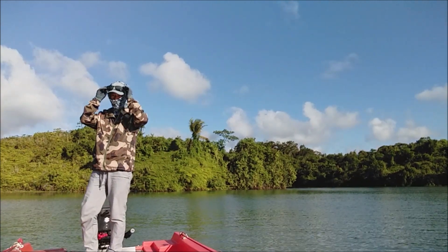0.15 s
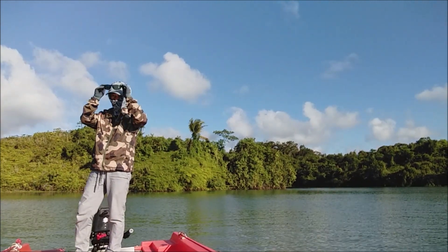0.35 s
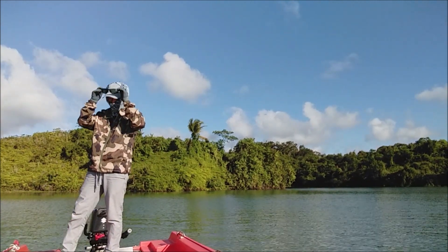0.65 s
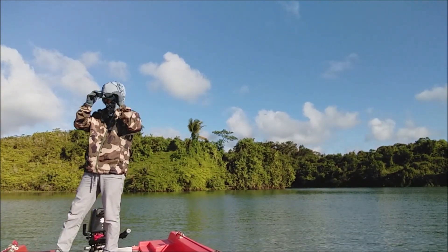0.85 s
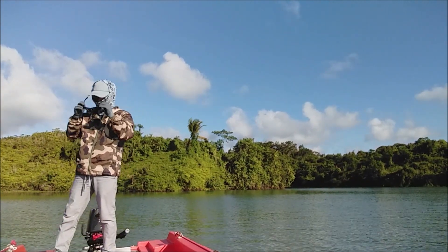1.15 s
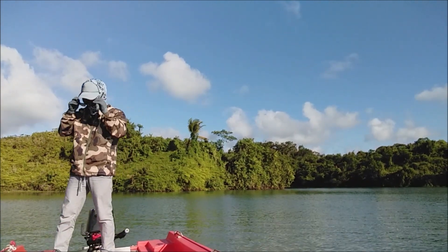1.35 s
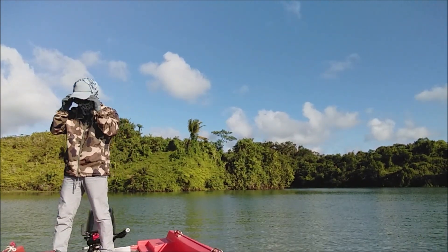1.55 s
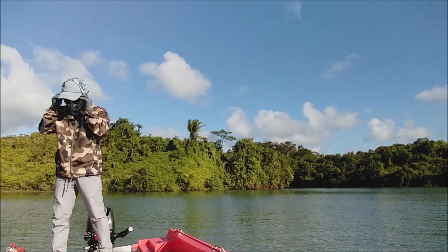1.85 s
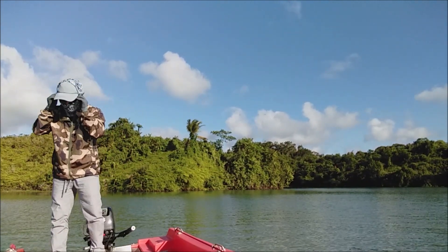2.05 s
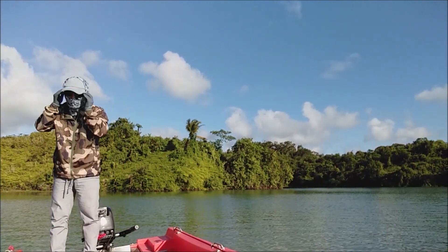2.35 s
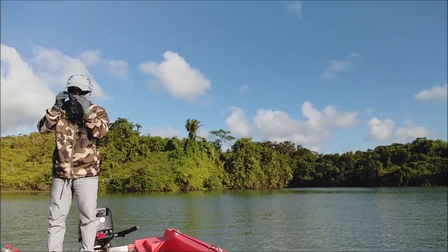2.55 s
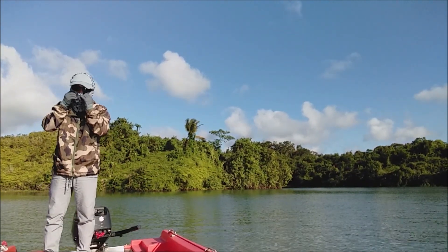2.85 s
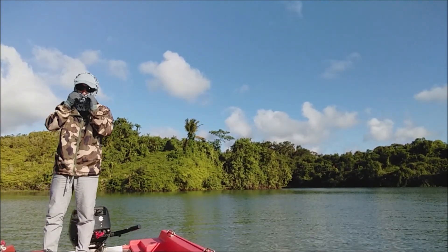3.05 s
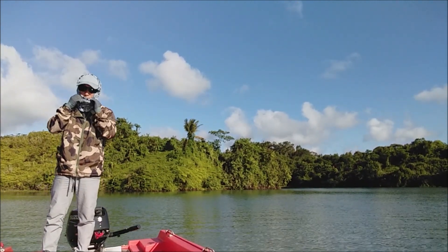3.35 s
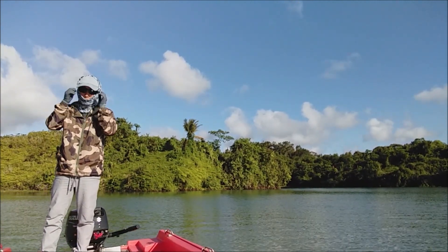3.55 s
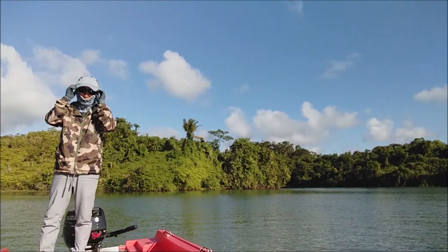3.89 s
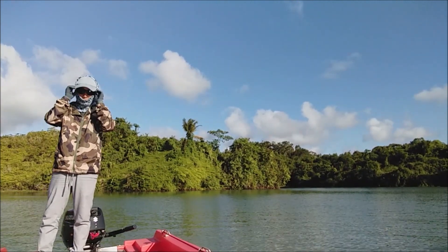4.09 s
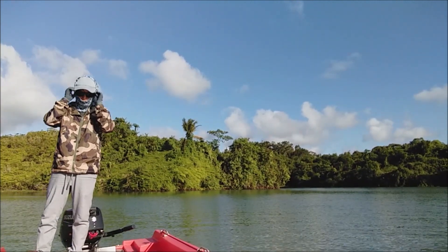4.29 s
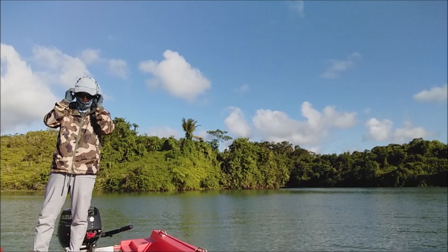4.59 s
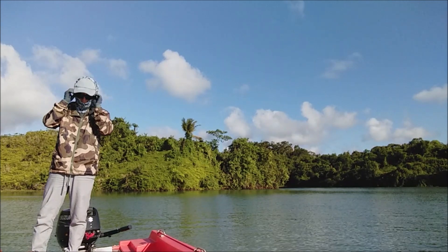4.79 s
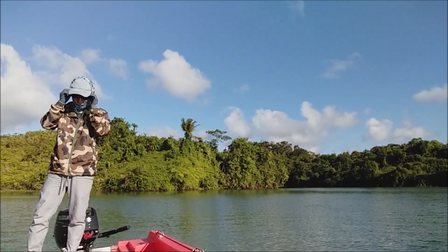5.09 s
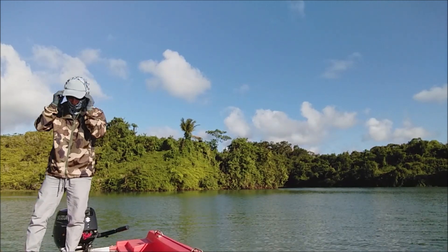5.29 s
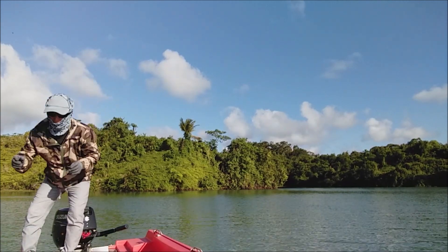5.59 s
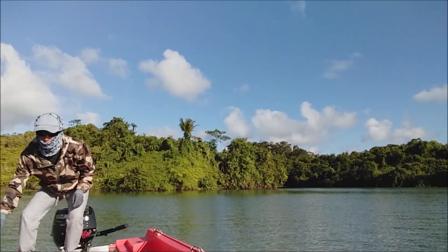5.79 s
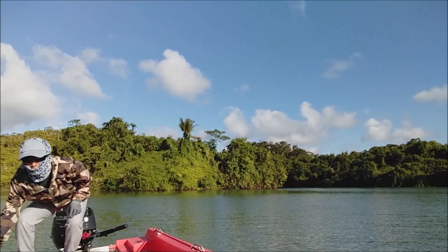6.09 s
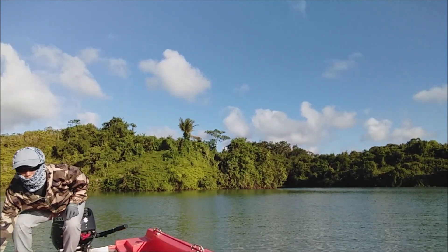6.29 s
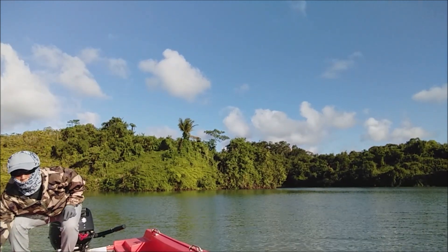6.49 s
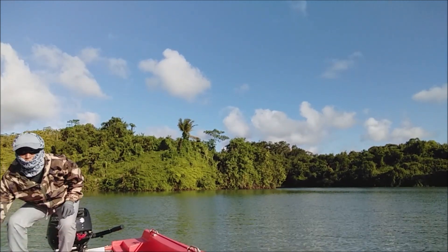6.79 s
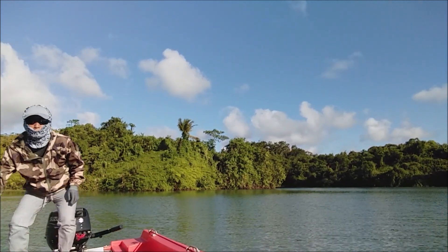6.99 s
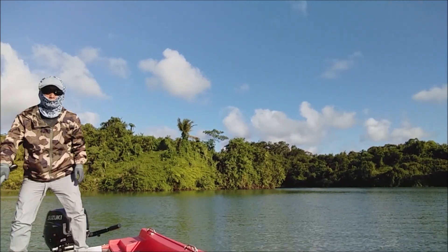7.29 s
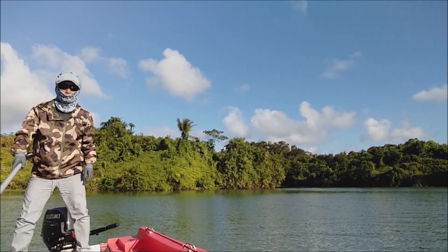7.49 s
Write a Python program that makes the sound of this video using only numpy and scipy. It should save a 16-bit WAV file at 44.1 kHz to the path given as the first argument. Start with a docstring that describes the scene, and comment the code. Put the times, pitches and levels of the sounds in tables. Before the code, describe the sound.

Outdoors on a calm lake, high insects pulse faintly over a soft hush. An angler shifts on a small plastic boat: dull low knocks, slight ripples, dry clicks and a sharper gear rap. A faint bird whistles midway. Then cloth rustles and the hull thumps in a dense, loud, irregular run of hollow knocks to the end. Close microphone on the boat, dry, no echo.

```python
"""Insects pulse and hum on the bank of a calm lake all along, as shaped noise over a faint hush.
First an angler shifts his feet on a small plastic boat: pushes on filtered panels knock, ripples murmur
under the hull, and hard gear clicks and raps as bursts of noise with ringing tones. Then a far bird whistles
in sliding tones and hollow gear clonks. At last he bends down: his jacket rustles as swelling noise, and the
rocking hull thumps in a dense run of hollow knocks, with more raps, a clonk and one peep among them."""
import sys
import numpy as np
from scipy import signal
from scipy.fft import rfft, irfft, next_fast_len
from scipy.io import wavfile
from scipy.ndimage import map_coordinates

SR = 44100
rng = np.random.default_rng(int(sys.argv[2]) if len(sys.argv) > 2 else 0)


def wrap_up_sound(samples):
    """Save the sound to the file named by the first command line argument, as 16-bit audio."""
    columns = np.atleast_2d(samples).T
    # keep every value between -1 and 1, then stretch to whole-number steps
    tamed = np.clip(columns, -1, 1)
    steps = np.round(tamed * 32767).astype(np.int16)
    wavfile.write(sys.argv[1], SR, steps)


N = 336873
TIME = np.arange(N) / SR  # seconds since the start of the scene
AGE = np.arange(SR // 2) / SR  # seconds since a blow, for half a second
TOP_HZ = 14290  # upper limit of the finished sound

# Spectra of noises. Each row: frequency in Hz, relative level per Hz in dB.
AIR_SPECTRUM = [(20, -21), (35, -24), (65, 7.5), (150, 3.5), (300, 0), (480, -8.5), (1000, -9.5),
                (1900, -11.5), (3400, -3.5), (5200, -2.5), (6800, -11), (10000, -8), (14000, -10.5)]
SINGER_SPECTRUM = [(7000, -45), (8300, -19), (9300, -15), (10150, -14), (10600, -8), (11100, -3),
                   (11600, 0.5), (12100, -7.5), (13000, -24.5), (14000, -36)]
CHORUS_SPECTRUM = [(6500, -22), (8400, -8), (9100, -12.5), (9900, -0.5), (10300, -2), (11400, -5.5),
                   (12450, -10.5), (13300, -26.5), (14500, -34)]
CLOTH_SPECTRUM = [(300, 10.5), (1000, -2.5), (2500, -4), (5500, 2.5), (8000, -2.5), (14000, -7.5)]
SNAP_SPECTRUM = [(600, -44), (1400, -12), (2000, -5.5), (3200, -5), (6000, -5.5), (8500, -10), (14000, -12)]
HOLLOW_WASH_SPECTRUM = [(50, -22), (100, -9.5), (200, -3.5), (340, 1), (470, 0), (620, -10), (900, -21),
                        (2500, -43)]
CRACK_SPECTRUM = [(200, -24), (700, -2.5), (1500, 2.5), (2400, -4), (3800, -5.5), (6000, -6.5), (9000, -21),
                  (14000, -22)]
RATTLE_SPECTRUM = [(90, 14), (250, -3), (550, 5), (1050, 0), (1450, 4), (1900, -2.5), (2500, -2.5),
                   (6000, -15), (12000, -38)]

# The pulsing insect's phrases. Each row: middle in seconds, length in seconds, level in dB.
SINGER_PHRASES = [(.39, 0.45, -67), (1.13, 0.4, -65.5), (1.76, 0.52, -63), (2.4, 0.36, -71),
                  (3.12, .3, -66), (3.76, 0.52, -66), (4.57, 0.5, -65), (5.1, 0.17, -66),
                  (5.4, 0.34, -64.5), (6.01, 0.29, -64), (6.57, 0.59, -65), (7.26, 0.57, -62)]
SINGER_REST_DB = -73  # between phrases
# Loudness of the steady insects. Each row: time in seconds, level in dB before the chorus trim.
CHORUS_LEVELS = [(0, -71), (1.65, -69), (2.9, -72.5), (4.45, -74.5), (5.1, -80.5), (6.3, -74), (6.8, -69.5),
                 (7.64, -75)]

# A far bird's rising whistles. Each row: start in seconds, level in dB before the flutter.
BIRD_WHISTLES = [(3.92, -80), (4.12, -77), (4.32, -72), (4.525, -72), (4.715, -75), (4.92, -70)]
WHISTLE_S, WHISTLE_FROM_HZ, WHISTLE_TO_HZ = .13, 4750, 6300
PEEP_S, PEEP_LENGTH_S, PEEP_HZ, PEEP_DB = 6.864, .043, 2975, -59  # a note without a slide

# Ripples slapping under the hull. Each row: middle in seconds, length in seconds, level in dB before the trim.
HULL_RIPPLES = [(.3, 0.74, -64.5), (.66, .1, -61), (.95, 0.21, -54), (1.15, .1, -57), (2.0, 0.38, -68),
                (2.29, 0.13, -52), (2.8, 0.21, -61.5), (5.06, 0.11, -61), (5.4, 0.098, -66),
                (5.73, 0.48, -62), (6.06, 0.085, -49.5), (6.25, 0.84, -59.5), (6.87, 0.11, -46),
                (7.3, 0.11, -33.5), (7.6, 0.098, -34.5)]
# Water at rest, before the trim; water stirred by a blow, against that blow; time to fall by 60 dB.
CALM_DB, STIR_DB, STIR_T60_S = -80, -12, 0.1

# The jacket rubs as he bends and straightens. Each row: middle in seconds, length in seconds, level in dB.
JACKET_RUBS = [(5.7, 0.35, -68), (5.81, 0.15, -63.5), (6.06, 0.31, -62.5), (6.55, 1, -71.5),
               (7.03, 0.45, -64), (7.5, 0.65, -66)]

# Small plastic clicks. Each row: start in seconds, snap level in dB before the snap trims, ring level in dB,
# ring pitch in Hz, time in seconds for the ring to fall by 60 dB.
PLASTIC_CLICKS = [(1.126, -74, -52, 1436, 0.057), (1.126, -78, -57, 1640, 0.054),
                  (1.9773, -46.5, -37, 3070, 0.02), (2.493, -60, -64, 2400, 0.064),
                  (3.710, -66, -63, 3500, .06), (3.8148, -51.5, -48, 3580, 0.029),
                  (4.268, -54.5, -60, 3530, 0.057), (4.939, -72, -52.5, 1255, 0.12),
                  (4.962, -52.5, -58, 2160, 0.047), (5.4878, -58, -55.5, 2190, 0.079),
                  (5.492, -69, -59, 1830, 0.11), (7.608, -75, -57, 1880, 0.047)]
# Overtones of small plastic parts. Each row: pitch in Hz, relative level in dB, seconds to fall by 60 dB.
PLASTIC_OVERTONES = [(1850, -8.5, .04), (2400, -9.5, .04), (3260, -5, 0.056), (3730, -8, .035),
                     (4530, -5, 0.038), (4870, -4, .03), (6100, -7, 0.026)]

# Bumps on a hollow piece of gear. Each row: start in seconds, level in dB.
HOLLOW_BUMPS = [(4.956, -37), (6.621, -33.5)]
# Tones of that hollow piece. Each row: pitch in Hz, relative level in dB, seconds to fall by 60 dB.
HOLLOW_MODES = [(105, -10, 0.17), (409, -6.5, 0.069), (450.2, -3, 0.21), (524, -12.5, 0.26),
                (573, -27, 0.22), (595, -13.5, 0.025)]

# Hard gear striking or scuffing the deck. Each row: start in seconds, crack level in dB, rattle level in dB,
# deck ring level in dB.
GEAR_RAPS = [(1.122, -50.5, -58.5, -74), (2.213, -80, -69.5, -66), (2.25, -80, -71, -67.5),
             (2.621, -43, -54.5, -38), (6.619, -52.5, -61.5, -56), (6.668, -46.5, -56.5, -46),
             (6.681, -42.5, -60, -64), (7.137, -52.5, -61.5, -55), (7.256, -49.5, -56.5, -60),
             (7.329, -67, -59, -46.5)]
# Tones of the deck. Each row: pitch in Hz, relative level in dB, seconds to fall by 60 dB.
DECK_MODES = [(117, -6, 0.24), (160, -17, .2), (208, -8, 0.33), (323, -6, 0.19), (367, 1, 0.2),
              (440.5, -5, 0.2), (522, -14, 0.26), (578, -2.5, 0.11), (707, -10, 0.116), (1420, -19, .16),
              (1550, -29, 0.13), (1863, -17, .07), (3070, -23, 0.043)]

# Dull blows on the hull. Each row: time in seconds, peak level of the boom in dB, contact time in seconds,
# scuffing before the blow in seconds, settling after it in seconds.
HULL_KNOCKS = [(0.2188, -49, .007, 0.033, 0.057), (0.6682, -42.5, 0.0055, 0.0089, 0.0056),
               (0.8408, -37.5, 0.0069, 0.0045, .015), (0.8908, -45, .0048, .008, 0.024),
               (0.9759, -50.5, 0.0036, 0.031, 0.014), (2.2312, -45, .0066, 0.075, 0.015),
               (2.639, -39.5, 0.0014, .004, 0.0037), (2.6428, -34.5, 0.0024, 0.0018, 0.021),
               (2.6852, -37.5, 0.0025, 0.0054, 0.01), (2.73, -46.5, 0.0021, 0.02, .008),
               (5.5407, -48.5, 0.01, .012, 0.016), (5.72, -43, 0.004, 0.012, .008),
               (5.904, -40.5, 0.0034, 0.0075, 0.037), (6.0386, -47, .009, .012, 0.029),
               (6.0849, -38, 0.0048, 0.019, 0.0025), (6.273, -31.5, 0.0029, 0.012, .014),
               (6.3138, -38, 0.0052, 0.0046, 0.0034), (6.444, -34, 0.0041, 0.0034, 0.013),
               (6.473, -33.5, 0.0035, 0.021, 0.012), (6.4941, -30.5, 0.0022, 0.0047, 0.0064),
               (6.5042, -26, 0.0034, .004, 0.011), (6.5231, -27, 0.0041, 0.0045, 0.019),
               (6.576, -30, 0.0071, 0.01, 0.0036), (6.6651, -19, .0021, 0.0063, 0.015),
               (6.6886, -25.5, 0.0029, .016, 0.02), (6.741, -33.5, 0.0047, 0.028, 0.0039),
               (6.862, -39.5, .0038, 0.055, 0.044), (6.89, -32.5, 0.0052, 0.014, .012),
               (6.931, -23.5, 0.0021, 0.0057, 0.0039), (6.9372, -24.5, 0.0023, 0.0035, 0.0051),
               (6.966, -29, 0.0035, 0.0044, 0.011), (6.9806, -22.5, 0.0018, .003, .004),
               (6.99, -11.5, 0.0029, .003, 0.0075), (7.0057, -30, .0035, .004, 0.013),
               (7.0711, -19.5, 0.0028, 0.0066, 0.022), (7.0864, -24.5, 0.002, .004, 0.0055),
               (7.0951, -22.5, 0.0028, 0.0044, 0.0084), (7.16, -23, 0.0042, 0.0087, 0.0084),
               (7.1977, -21.5, 0.0021, 0.0086, 0.041), (7.2235, -16, 0.0022, 0.021, 0.01),
               (7.2503, -24.5, 0.002, 0.006, .012), (7.3026, -15, 0.0014, 0.0089, 0.012),
               (7.3105, -14, 0.0021, 0.0036, 0.0063), (7.3449, -23, 0.0034, 0.012, .008),
               (7.415, -20, 0.002, 0.0093, .016), (7.433, -17.5, 0.0022, 0.018, .008),
               (7.484, -11.5, 0.0011, .003, .004), (7.4906, -20, 0.0047, .003, 0.01),
               (7.558, -19, 0.0019, 0.0089, 0.014), (7.5649, -21, 0.00071, 0.0026, 0.0058),
               (7.5719, -16.5, 0.0016, 0.0033, 0.023), (7.6061, -24.5, 0.0027, 0.013, 0.091)]
# Resonances of the shell, shared by all panels. Each row: pitch in Hz, width in Hz, level against the panel in dB.
SHELL_MODES = [(66.4, 14, -16), (244, 97, -14), (378, 180, -14.5), (600, 170, -13.5)]
# Panel pitch at this contact time; a softer blow moves a wider, lower panel, by this power.
PANEL_HZ, PANEL_CONTACT_S, PANEL_SAG = 152.5, 0.0019, 0.3
PANEL_TOP_HZ = 174  # pitch of the smallest panel
# Lesser contacts: typical spacing, level against the blow, loss over the scuffing or settling time.
CLATTER_GAP_S, CLATTER_DB, CLATTER_FALL_DB = 0.00746, -0.5, 12
SOFTENING = 0.32  # a weaker contact lasts longer, by this power of its relative strength


def amp(db):
    """Turn decibels into a gain."""
    return 10 ** (np.asarray(db) / 20)


def unit(x):
    """Scale a sound to an average strength (rms) of 1."""
    return x / np.sqrt(np.mean(x ** 2) + 1e-20)


def wobble(rate):
    """A smooth random curve through this many random points a second."""
    points = rng.standard_normal(int(N * rate / SR) + 4)
    return map_coordinates(points, [TIME * rate])


def filtered(x, response):
    """Reshape a sound by a response that depends on frequency."""
    size = next_fast_len(len(x) + 8192)
    hz = np.fft.rfftfreq(size, 1 / SR)
    return irfft(rfft(x, size) * response(hz), size)[:len(x)]


def noise(spectrum, size=N):
    """Random hiss of rms 1, coloured by the points of a spectrum."""
    points_hz, points_db = np.transpose(spectrum)

    def colour(hz):
        return amp(np.interp(np.log(hz + 1), np.log(points_hz), points_db))

    return unit(filtered(rng.standard_normal(size), colour))


def fade(t60, attack):
    """A struck thing swells quickly, then dies away by 60 dB in t60 seconds."""
    decay = np.exp(-np.log(1000) * AGE / t60)
    return decay * (1 - np.exp(-AGE / attack))


def ring(modes, scatter_db, attack):
    """A struck thing rings in several tones, each of slightly new strength every time."""
    total = np.zeros(len(AGE))
    for k, (hz, db, t60) in enumerate(modes):
        strength = amp(db + scatter_db * rng.standard_normal())
        tone = np.sin(2 * np.pi * hz * AGE) * fade(t60, attack)
        total += (-1) ** k * strength * tone
    return total


def swells(rows):
    """Summed power of bell-shaped swells, each 6 dB down at the ends of its length."""
    power = np.zeros(N)
    for middle, length, db in rows:
        offset = 2 * (TIME - middle) / length
        power += amp(db) ** 2 * .5 ** (2 * offset ** 2)
    return power


def add(track, s, sound):
    """Mix a sound into the track at time s."""
    part = track[max(round(s * SR), 0):][:len(sound)]
    part += sound[:len(part)]


def shell(hz, panel_hz, panel_q=2.0, damping_hz=800, leak_hz=55):
    """A panel booms with the shell's broad modes; plastic swallows treble and radiates no deep bass."""
    def mode(centre, width):
        return 1j * hz * width / (centre ** 2 - hz ** 2 + 1j * hz * width)

    modes = mode(panel_hz, panel_hz / panel_q)
    for centre, width, db in SHELL_MODES:
        modes = modes + amp(db) * mode(centre, width)
    treble_loss = np.sqrt(1 + (hz / damping_hz) ** 4)
    bass_loss = np.sqrt(1 + (leak_hz / (hz + 1)) ** 10)
    return modes / treble_loss / bass_loss


def air(level_db=-70):
    """Open air is a faint, steady hush of coloured noise."""
    return amp(level_db) * noise(AIR_SPECTRUM)


def insects(chorus_trim_db=2, stroke_hz=22.9, depth_db=7.0, uneven_db=1.3):
    """One singer buzzes in swelling phrases of regular wing strokes over a steady chorus."""
    phrasing = np.sqrt(amp(SINGER_REST_DB) ** 2 + swells(SINGER_PHRASES))
    stroke = np.cos(2 * np.pi * (stroke_hz * TIME - .27))
    # tanh flattens the strokes, so the buzz switches briskly between strong and weak
    pulsing_db = depth_db * np.tanh(2.4 * stroke) + uneven_db * wobble(15)
    singer = unit(amp(pulsing_db) * noise(SINGER_SPECTRUM))
    chorus_db = np.interp(TIME, *np.transpose(CHORUS_LEVELS)) + chorus_trim_db
    return phrasing * singer + amp(chorus_db) * noise(CHORUS_SPECTRUM)


def note(length, start_hz, end_hz, db, overtone_db, waver=0.055, flutter_db=3.0):
    """A thin whistle with an octave overtone; the wider its slide, the less steady it is."""
    u = np.linspace(0, 1, int(length * SR))  # progress from 0 to 1
    slide = np.sin(np.pi * u / 2) + waver * wobble(300)[:len(u)]
    hz = start_hz + (end_hz - start_hz) * slide
    phase = 2 * np.pi * np.cumsum(hz) / SR
    level = amp(db + flutter_db * wobble(140)[:len(u)]) * np.sin(np.pi * u)
    return level * (np.sin(phase) + amp(overtone_db) * np.sin(2 * phase))


def bird():
    """A far bird repeats one rising whistle; later comes a single level peep with a strong octave."""
    track = np.zeros(N)
    for s, db in BIRD_WHISTLES:
        add(track, s, note(WHISTLE_S, WHISTLE_FROM_HZ, WHISTLE_TO_HZ, db, overtone_db=-40))
    add(track, PEEP_S, note(PEEP_LENGTH_S, PEEP_HZ, PEEP_HZ, PEEP_DB, overtone_db=-2))
    return track


def lapping(trim_db=-2, panel_hz=115, dull_hz=130, surge_db=2):
    """Ripples keep the shell murmuring, and every blow stirs the water anew."""
    def dull_shell(hz):
        return shell(hz, panel_hz, panel_q=1.06) * np.exp(-hz / dull_hz)

    murmur = unit(filtered(rng.standard_normal(N), dull_shell))
    power = amp(CALM_DB) ** 2 + swells(HULL_RIPPLES)
    stir = fade(STIR_T60_S, attack=0.0033)
    for s, db, *_ in HULL_KNOCKS:
        add(power, s, (amp(db + STIR_DB) * stir) ** 2)
    return np.sqrt(power) * amp(trim_db + surge_db * wobble(30)) * murmur


def jacket(grain_db=2.0, surge_db=0.3):
    """Cloth rubs in an uneven hiss that swells with each movement."""
    unevenness = amp(grain_db * wobble(60) + surge_db * wobble(14))
    return np.sqrt(swells(JACKET_RUBS)) * unevenness * noise(CLOTH_SPECTRUM)


def clicks(overtone_db=-5, snap_trim_db=-2, rough=0.66):
    """Small plastic gives a dry snap, one short rough ring and a few faint overtones."""
    track = np.zeros(N)
    for s, snap_db, ring_db, hz, t60 in PLASTIC_CLICKS:
        hiss = noise(SNAP_SPECTRUM, size=len(AGE)) * fade(t60=0.042, attack=0.00098)
        overtones = ring(PLASTIC_OVERTONES, scatter_db=2, attack=0.00075)
        snap = amp(snap_trim_db) * hiss + amp(overtone_db) * overtones
        # a random shake of the phase, in radians, roughens the ring
        phase = 2 * np.pi * hz * AGE + rough * wobble(370)[:len(AGE)]
        tone = np.sin(phase) * fade(t60, attack=0.00085)
        add(track, s, amp(snap_db) * snap + amp(ring_db) * tone)
    return track


def clonks(wash_db=-11):
    """Close modes of a hollow piece beat as they fade into the hull's dull wash."""
    track = np.zeros(N)
    for s, db in HOLLOW_BUMPS:
        wash = noise(HOLLOW_WASH_SPECTRUM, size=len(AGE)) * fade(t60=0.28, attack=0.0026)
        tones = ring(HOLLOW_MODES, scatter_db=0.5, attack=0.0012)
        add(track, s, amp(db) * (tones + amp(wash_db) * wash))
    return track


def raps():
    """Hard gear cracks on the deck, rattles briefly and sets the deck ringing."""
    track = np.zeros(N)
    for s, crack_db, rattle_db, ring_db in GEAR_RAPS:
        crack = noise(CRACK_SPECTRUM, size=len(AGE)) * fade(t60=0.02, attack=0.0009)
        rattle = noise(RATTLE_SPECTRUM, size=len(AGE)) * fade(t60=0.27, attack=0.0019)
        deck = ring(DECK_MODES, scatter_db=2.0, attack=0.0085)
        add(track, s, amp(crack_db) * crack + amp(rattle_db) * rattle + amp(ring_db) * deck)
    return track


def contact(hz, duration):
    """A push that lasts this long holds little above 1 / duration."""
    smooth_push = signal.butter(5, 1, analog=True)[1]
    return 1 / np.polyval(smooth_push, 1j * hz * duration)


def clatter(scuff_s, settle_s, jitter=0.31, scatter_db=1.0, count=6):
    """Uneven lesser contacts, as (delay in s, gain), build up to a blow and die away after it."""
    contacts = []
    # the signs put scuffing before the blow and settling after it
    for side, span in ((-0.986, scuff_s), (0.98, settle_s)):
        gaps = CLATTER_GAP_S * np.exp(jitter * rng.standard_normal(count))
        delay = np.cumsum(gaps)
        level_db = CLATTER_DB + scatter_db * rng.standard_normal(count) - CLATTER_FALL_DB * delay / span
        contacts += zip(side * delay, amp(level_db))
    return [(delay, gain) for delay, gain in contacts if gain > .04]  # leave out the faintest


def knocks(after_db=-41, after_t60=0.23, after_hz=360):
    """Each blow is a short push on a panel amid softer clatter, duller if soft; the hull shudders on after."""
    track = np.zeros(N)
    lead = SR // 40  # samples of room before the push
    push = np.zeros(len(AGE))
    push[lead] = 1.0
    for s, db, duration, scuff_s, settle_s in HULL_KNOCKS:
        panel_hz = min(PANEL_HZ * (PANEL_CONTACT_S / duration) ** PANEL_SAG, PANEL_TOP_HZ)

        def struck(hz, contact_s=duration):
            return shell(hz, panel_hz) * contact(hz, contact_s)

        def dull_struck(hz):
            return struck(hz) / (1 + (hz / after_hz) ** 4)

        boom = filtered(push, struck)
        trembling = rng.standard_normal(len(AGE)) * fade(after_t60, attack=0.0026)
        shudder = filtered(np.roll(trembling, lead), dull_struck)
        blow = (boom + amp(after_db) * shudder) / np.abs(boom).max()
        add(track, s - boom.argmax() / SR, amp(db) * blow)  # the boom's crest falls at time s
        for delay, gain in clatter(scuff_s, settle_s):
            softer_s = duration / gain ** SOFTENING
            bump = filtered(push, lambda hz: struck(hz, softer_s))
            add(track, s + delay - bump.argmax() / SR, amp(db) * gain * bump / np.abs(bump).max())
    return track


def scene():
    """Open water: everything arrives without echo over a faint hush."""
    surroundings = air() + insects() + bird()
    boat = lapping() + jacket() + clicks() + clonks() + raps() + knocks()
    return (surroundings + boat)[None]


def record(dry):
    """Keep only what lies below the upper frequency limit."""
    return filtered(dry[0], lambda hz: hz < TOP_HZ)[None]


dry = scene()
out = record(dry)
wrap_up_sound(out)
```